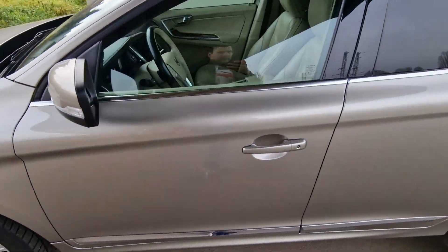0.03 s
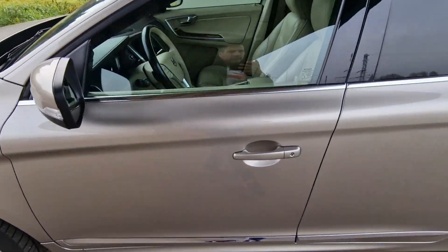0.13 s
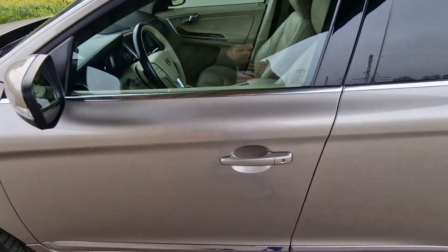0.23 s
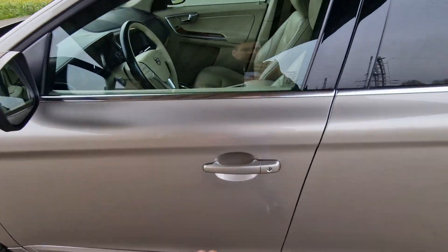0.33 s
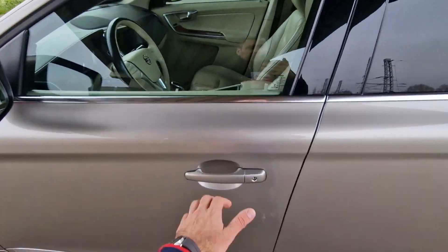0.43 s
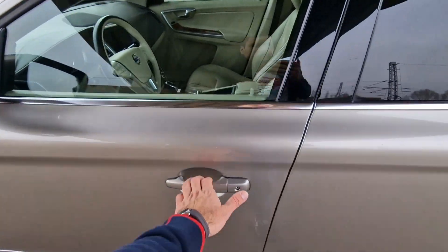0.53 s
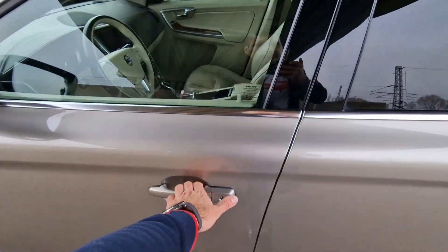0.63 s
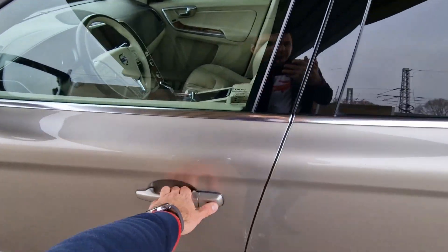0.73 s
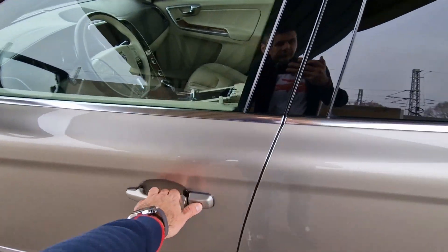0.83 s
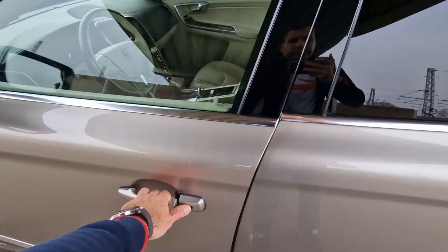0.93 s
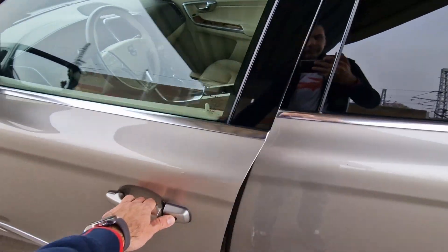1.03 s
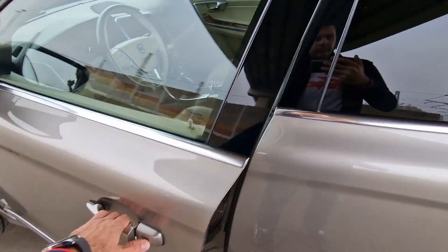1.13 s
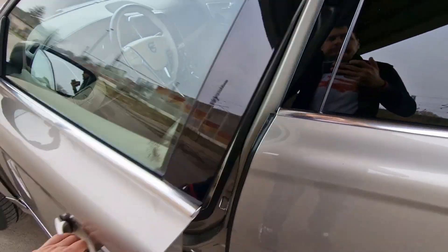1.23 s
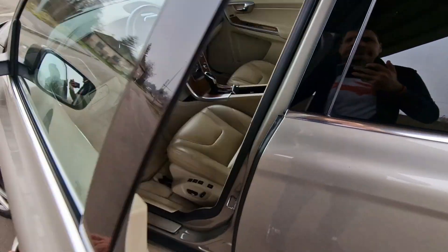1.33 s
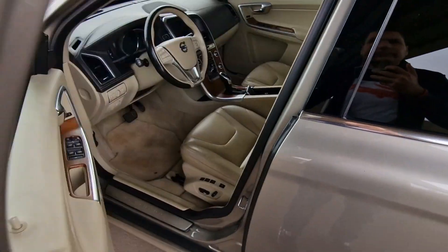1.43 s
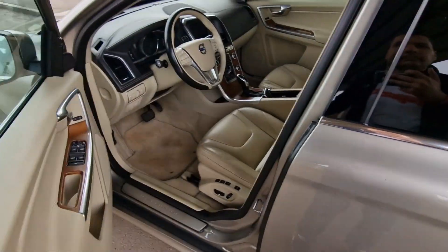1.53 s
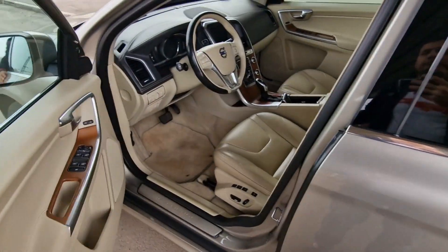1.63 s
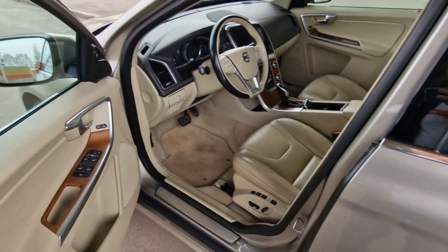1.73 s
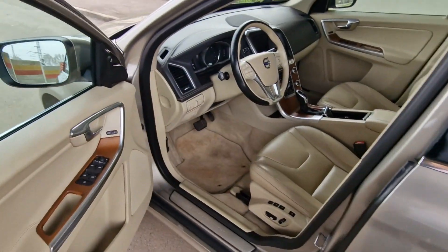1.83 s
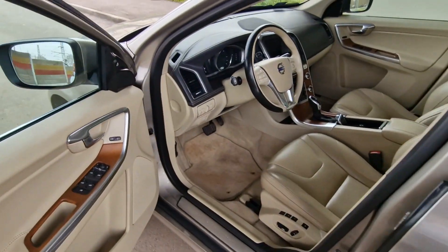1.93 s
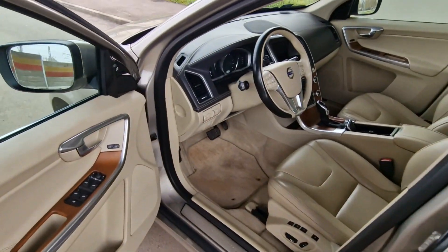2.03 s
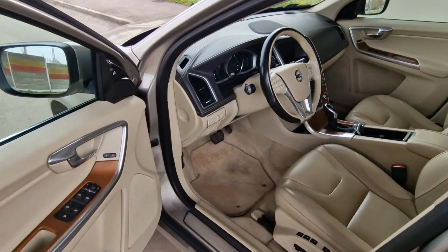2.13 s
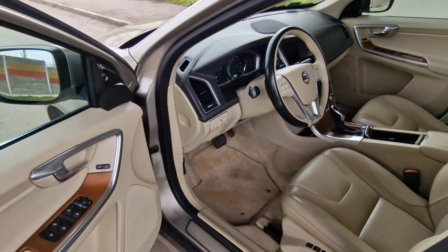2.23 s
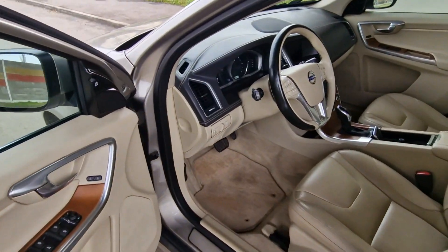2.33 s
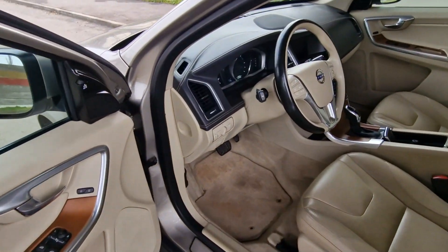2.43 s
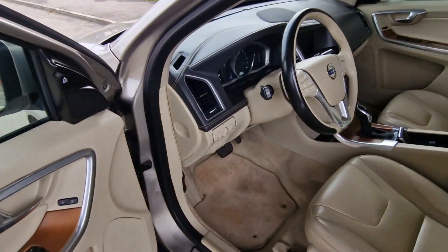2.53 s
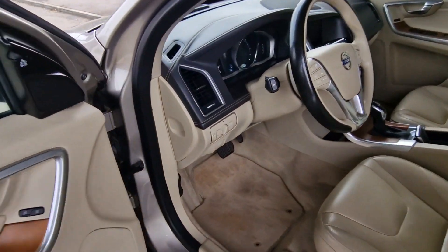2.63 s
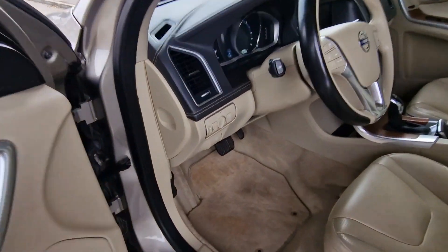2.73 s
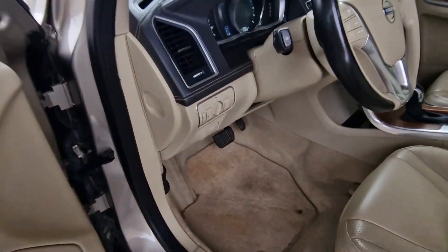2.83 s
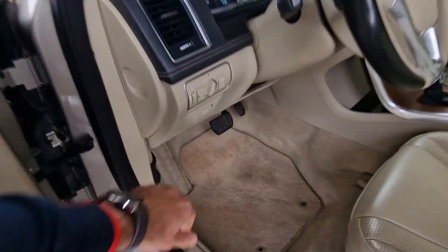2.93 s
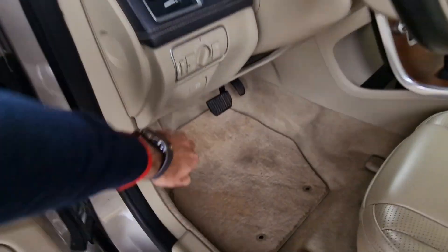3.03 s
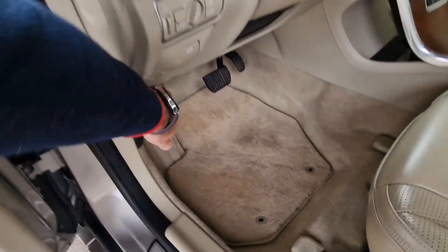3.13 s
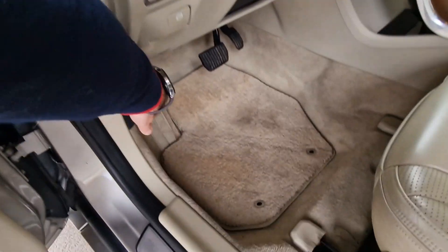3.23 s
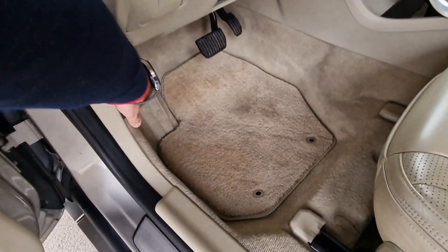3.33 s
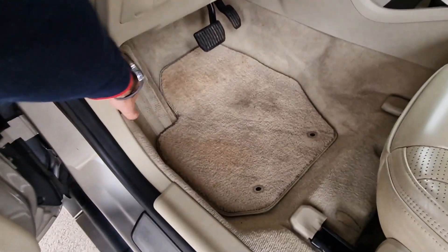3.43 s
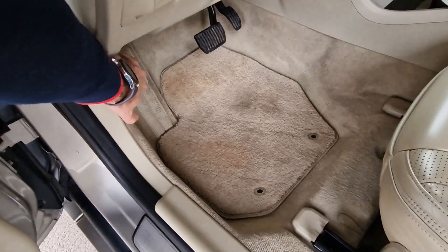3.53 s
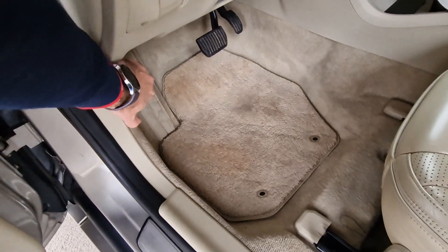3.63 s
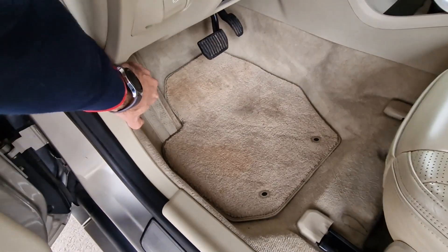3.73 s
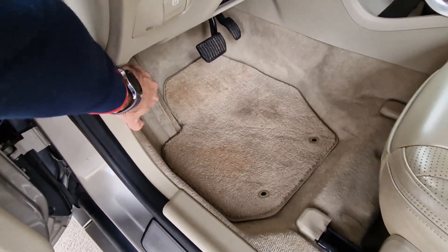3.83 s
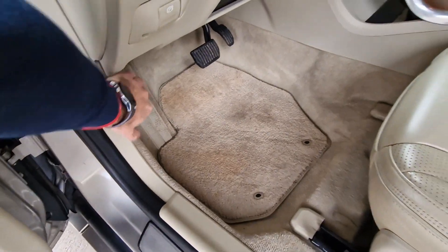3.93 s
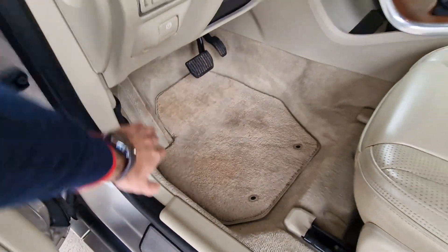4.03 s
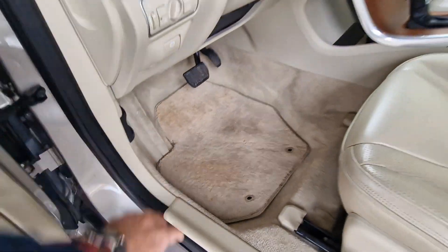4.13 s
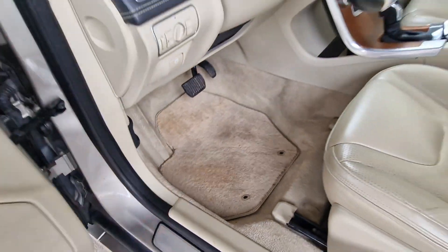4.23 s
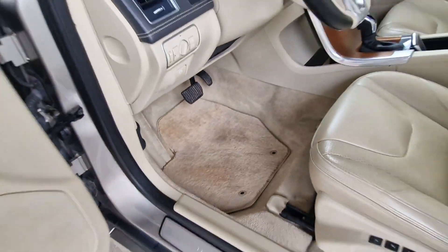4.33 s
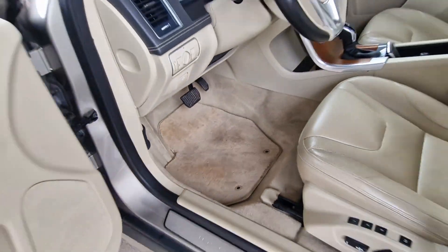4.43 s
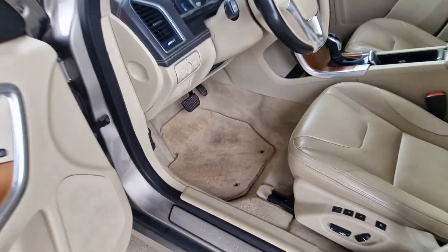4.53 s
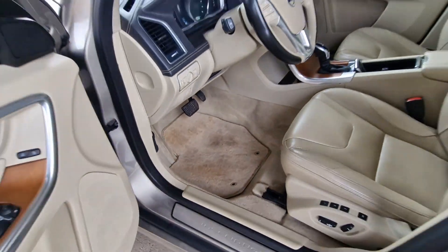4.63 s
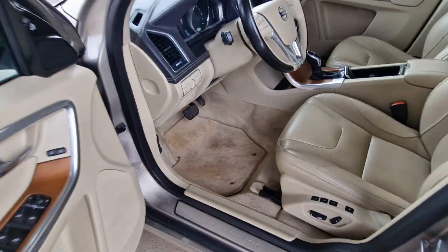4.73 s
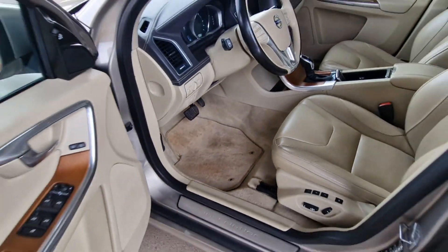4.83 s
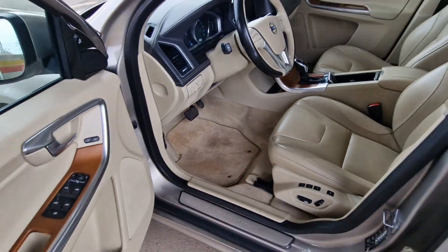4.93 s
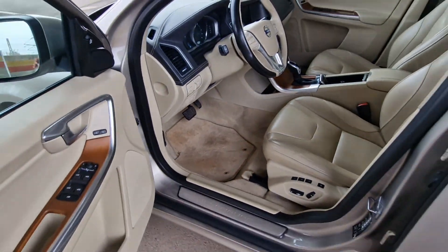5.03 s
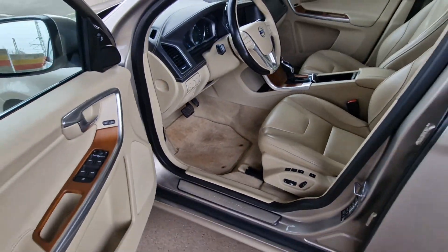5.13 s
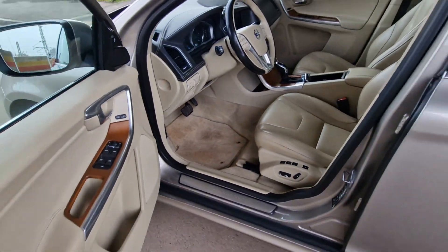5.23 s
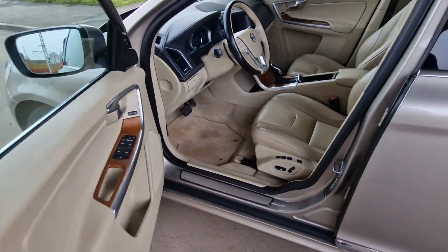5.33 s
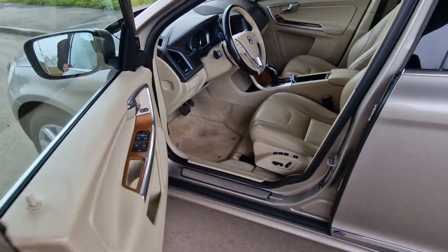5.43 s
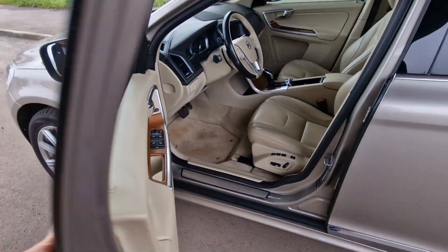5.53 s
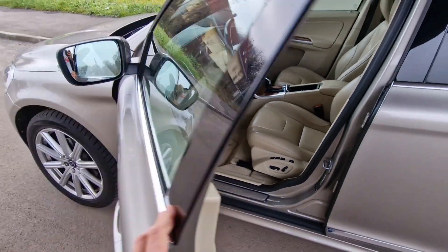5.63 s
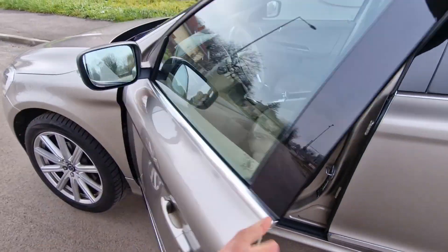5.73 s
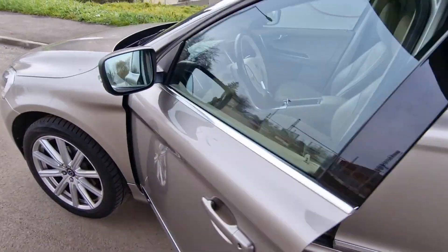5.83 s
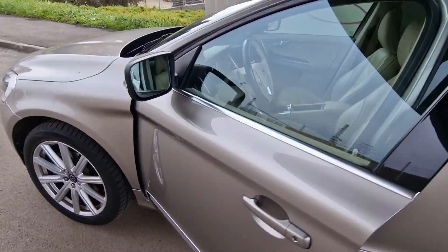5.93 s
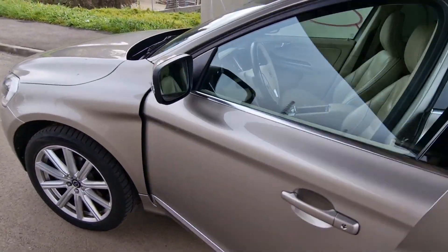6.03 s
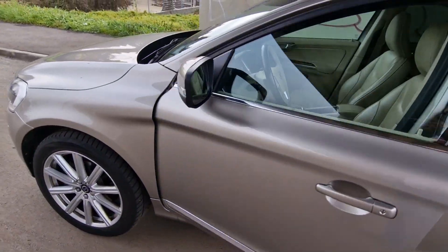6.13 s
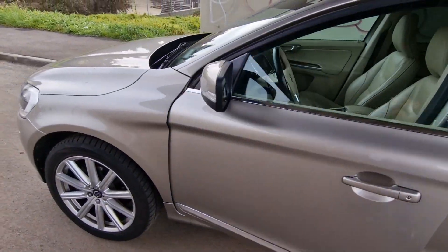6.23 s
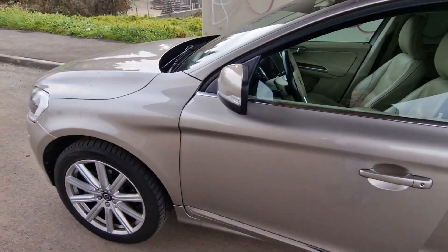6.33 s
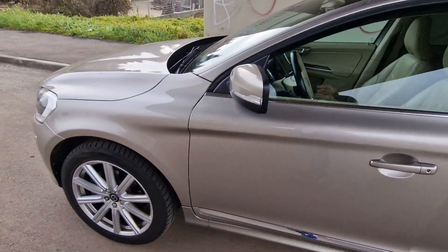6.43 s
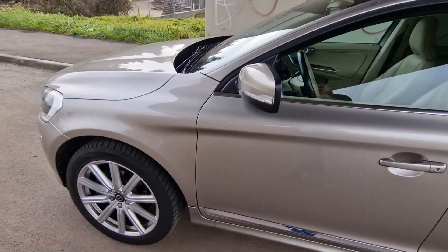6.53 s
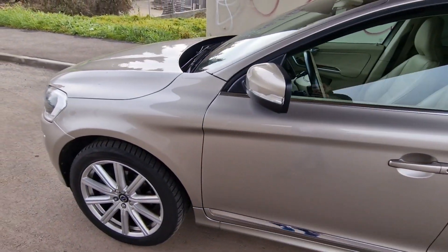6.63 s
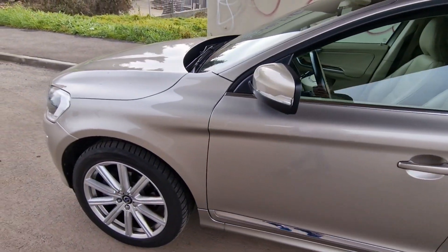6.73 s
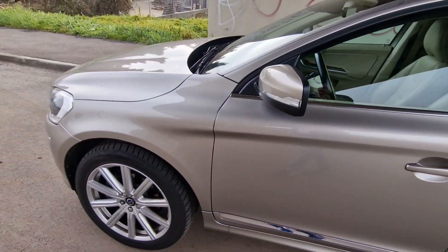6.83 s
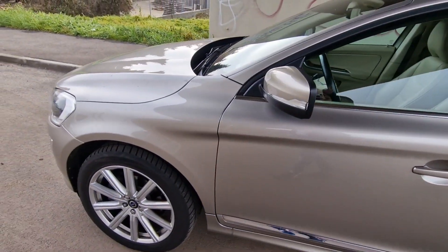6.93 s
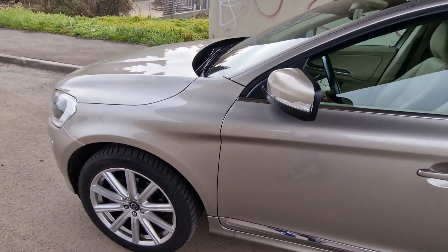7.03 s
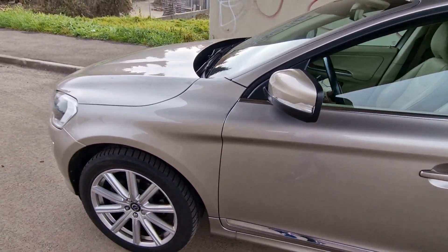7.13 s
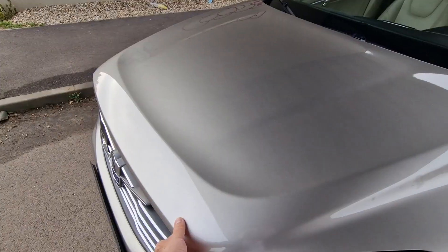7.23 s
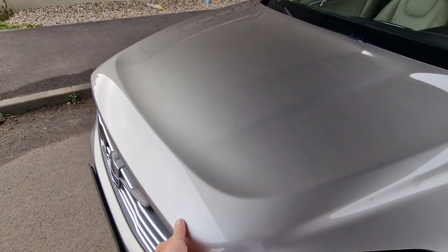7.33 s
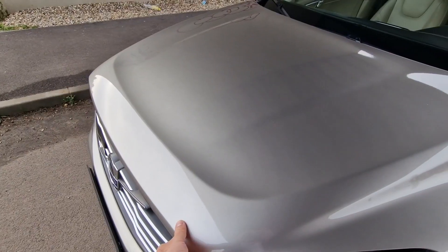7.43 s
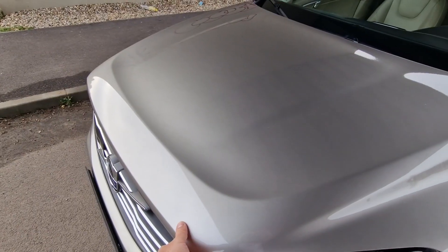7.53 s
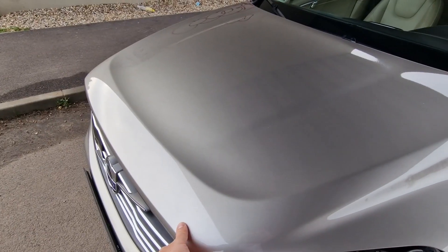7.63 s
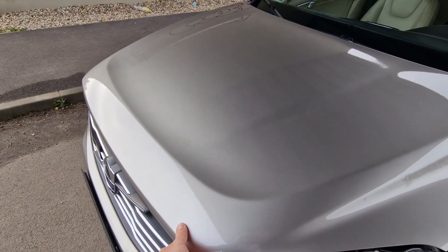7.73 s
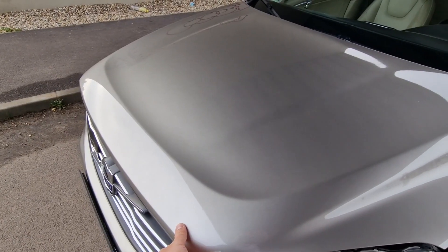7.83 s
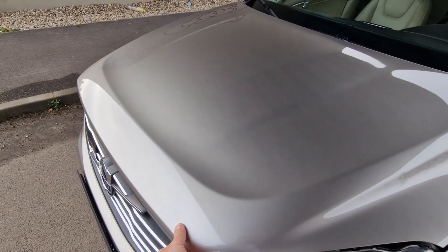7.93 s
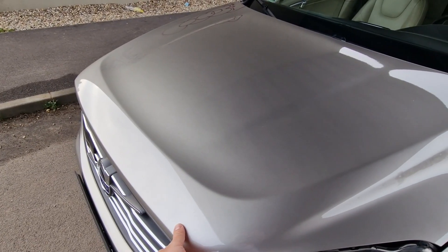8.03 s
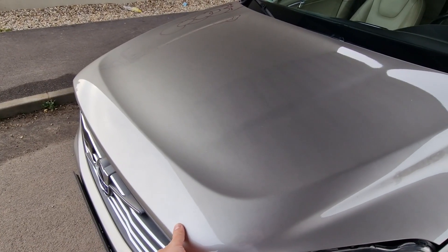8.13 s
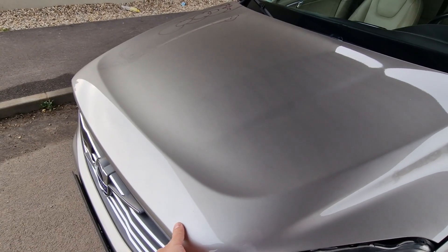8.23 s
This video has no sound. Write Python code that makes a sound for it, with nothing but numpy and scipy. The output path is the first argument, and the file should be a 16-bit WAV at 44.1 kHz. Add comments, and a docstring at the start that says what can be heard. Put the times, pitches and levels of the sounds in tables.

```python
"""A car door is unlatched, swung through its check stops and later slammed; each contact is a rattle of
dense clicks that excites latch modes, while soft pushes excite the door panel and the cabin air.
Between, the bonnet lever is pulled in the footwell: clicks, thumps, a groaning strain and a creaking cable.
Ticks, brushes, rubbing cloth, traffic roar, an engine hum, whines and hiss are shaped noise or tones.
Two microphone ports a hand apart hear the contacts with a small frequency-dependent lag."""
import sys
import numpy as np
from scipy import signal
from scipy.fft import rfft, irfft
from scipy.io import wavfile

SR = 44100
rng = np.random.default_rng(int(sys.argv[2]) if len(sys.argv) > 2 else 0)


def wrap_up_sound(samples):
    """Save the sound to the file named by the first command line argument, as 16-bit audio."""
    columns = np.atleast_2d(samples).T
    # keep every value between -1 and 1, then stretch to whole-number steps
    tamed = np.clip(columns, -1, 1)
    steps = np.round(tamed * 32767).astype(np.int16)
    wavfile.write(sys.argv[1], SR, steps)


N = 366030

CLOTH_BRIGHT_DB = -60   # rubbing level at which the cloth sounds bright


def door():
    """Modal excitation: contact rattle rings the latch, and with the thumps the panel and cabin modes."""
    # latch, handle and frame strike metal: t/s, rattle level/dB, panel thump/dB, t60/ms, treble/dB
    strikes = [(0.841, -30.5, -25, 45.9, 18), (0.8784, -11, -8, 23.685, 3.5),
               (0.8938, -37, -13.5, 46.7, -4), (.963, -26.5, -52.5, 33.1, -27),
               (1.478, -12, -16, 133.02, -2), (1.506, -24.5, -15.5, 57.46, -9),
               (6.4785, -22.5, -21.5, 247.1, -25.5), (6.4951, -12.5, -5.5, 59.33, -3.5),
               (6.521, -25.5, -27, 53.7, -14), (6.5284, -11, -15, 25.415, -9),
               (6.664, -48.5, -25, 74.6, -26.5)]
    # trim and glass shudder on after the two hard stops: t/s, rattle level/dB
    shudders = [(1.53, -36), (6.555, -40.5)]
    # check strap rolls over its stops: t/s, panel thump/dB
    stops = [(.788, -32.5), (1.391, -19.5), (1.694, -21), (5.704, -24), (6.054, -24.5)]
    # modes of the latch: f/Hz, relative level/dB, t60/s
    latch_modes = [(549.67, -2, 0.05054), (650.4, 0, 0.03461), (1025.5, 2.5, 0.01877),
                   (1309.7, 5.5, 0.019888), (1604.8, -2.5, 0.016), (2141.3, -9.5, 0.03),
                   (2780.8, -15.5, 0.016), (3688.8, -14.5, 0.053)]
    # modes of the open door panel: f/Hz, relative level/dB, t60/s
    panel_modes = [(147.11, -9, 0.11516), (196.63, 2.5, 0.08519), (220.32, -3.5, 0.09315),
                   (284.19, -1, 0.08632), (353.11, 1, 0.07513), (417.54, -2.5, 0.065),
                   (544.21, -19.5, 0.11), (636.2, -25, 0.071)]
    # modes of the cabin: f/Hz, relative level/dB, t60/s
    cabin_modes = [(28.12, -14, 0.715), (62.189, -2.5, 0.899), (68.188, -4, 0.7836), (80.669, -3.5, 0.5755),
                   (130.75, -13, 0.743), (162.91, -2.5, 0.0952)]
    strike_rise_ms = 3.5
    shudder_rise_ms, shudder_t60_ms, shudder_treble_db = 19, 753.3, -20.5
    shudder_thump_db = 12   # relative to its rattle
    stop_rattle_db = -20   # relative to its thump
    stop_rise_ms, stop_t60_ms, stop_treble_db = 2.5078, 41.23, -37
    thump_lead_ms = 2.7736   # the push starts before the rattle peaks
    shut_s = 6.485
    open_boom_db, shut_boom_db = -21, -3.5   # relative to the thump: the sealed cabin booms more
    sealed_decay, sealed_db = 0.5543, -3.5   # the seal damps the shut panel: share of t60, change of level

    hard = [(s, db, strike_rise_ms, t60_ms, treble_db, thump_db)
            for s, db, thump_db, t60_ms, treble_db in strikes]
    hard += [(s, db, shudder_rise_ms, shudder_t60_ms, shudder_treble_db, db + shudder_thump_db)
             for s, db in shudders]
    hard = np.array(hard)
    dull = [(s, db + stop_rattle_db, stop_rise_ms, stop_t60_ms, stop_treble_db) for s, db in stops]
    rattle = rattles(hard[:, :5], rough_db=3.5, corner_hz=2281.7, scatter_db=1.5)
    rattle = rattle + rattles(dull, rough_db=6.5, corner_hz=850, scatter_db=-29.5)
    latch = rattle + from_db(-28.5) * ring(rattle, latch_modes, True, vary_db=3.5)

    thumps = np.array([*hard[:, [0, 5]], *stops]) - [thump_lead_ms / 1000, 0]
    sense = np.where(thumps[:, 0] > shut_s, 1, -1)   # the slam drives the panel the other way
    drive = from_db(-28.0) * rattle + pushes(thumps, 3.129, sense)
    shut = np.arange(N) / SR > shut_s
    sealed_modes = [(hz, db + sealed_db, t60 * sealed_decay) for hz, db, t60 in panel_modes]
    panel = ring(drive * ~shut, panel_modes, True) + ring(drive * shut, sealed_modes, False)

    booms = [(s, db + (shut_boom_db if s > shut_s else open_boom_db)) for s, db in thumps]
    cabin = ring(pushes(booms, 3.978, sense), cabin_modes, False)
    return latch + panel + from_db(2.5) * cabin


def lever():
    """Modal excitation with stick-slip: clicks and creaks ring the lever, tugs and groan the footwell."""
    # clicks and scrapes of the plastic lever and cable: t/s, level/dB, rise/ms, t60/ms, treble/dB
    clicks = [(3.43, -43, 19.37, 125.4, -7.5), (3.447, -30.5, 10.59, 75.6, -9),
              (3.593, -29.5, 4.309, 124.23, -4), (3.629, -43, 24.035, 472, -1),
              (3.955, -37, 67.27, 240, -1.5), (3.988, -6, 13, 64.95, 0), (4.344, -34, 14, 123.43, -1),
              (4.424, -37, 30, 142.8, -2.5), (4.44, -34, 4.364, 90.94, -4.5), (4.507, -40, 4.402, 69.26, 0)]
    # modes of the lever: f/Hz, relative level/dB, t60/s
    lever_modes = [(600, 2, 0.03), (813, -1, 0.03), (1090, 10, .03), (1780, 7, 0.022), (2510, -7, .035),
                   (3290, -9, .06), (4110, -23, .25)]
    # modes of the footwell: f/Hz, relative level/dB, t60/s
    footwell_modes = [(66.741, -7.5, 0.4148), (97.3, -4, 0.091), (161.03, -5.5, 0.1295), (249, -8, 0.09),
                      (371.7, -6, 0.074), (540, -10, 0.024)]
    # tugs that thump the footwell: t/s, push level/dB
    tugs = [(3.465, -28), (3.495, -32), (3.588, -25), (3.988, -35)]
    # cable strains and trim groans, dying away: start t/s, noise level before filtering/dB, t60/s
    strains = [(3.452, -54.5, 0.46), (3.6, -56, 0.82)]
    groan_hz = 262   # low-pass corner
    slips_per_s, creak_db = 300, -3.5   # stick-slip jerks of the cable; size relative to the strain noise

    rattle = rattles(clicks, rough_db=5.5, corner_hz=2600, scatter_db=7.0)
    strain, t = np.zeros(N), np.arange(SR // 2) / SR
    for start, level_db, t60 in strains:
        envelope = from_db(level_db - 60 * t / t60) * np.minimum(t / 0.013, 1)
        add(strain, start, envelope * rng.standard_normal(len(t)))
    slips = rng.random(N) < slips_per_s / SR
    creak = from_db(creak_db) * np.diff(strain * slips, prepend=0)
    groan = signal.lfilter(*signal.butter(1, groan_hz, fs=SR), strain)
    body = ring(from_db(-38.5) * rattle + creak, lever_modes, False, vary_db=4.0)
    footwell = ring(groan - pushes(tugs, 2.1) + from_db(-38) * rattle, footwell_modes, True)
    return rattle + body + footwell


def catch():
    """Contact noise: fingers nudge the bonnet catch, giving faint rattles without ringing modes."""
    # nudges: t/s, rattle level/dB, rise/ms, t60/ms, treble/dB
    nudges = [(7.639, -44.5, 3, 76.4, -14.5), (7.652, -46, 4, 207.3, -12)]
    return rattles(nudges, rough_db=3.0, corner_hz=3984, scatter_db=4.5)


def ticks():
    """Damped resonance: a short noise burst rings one wide mode; higher ticks add a low-passed knock."""
    # small ticks and knocks close by: t/s, relative peak level/dB, f/Hz, right port lag/ms
    contacts = [(0.183, -39, 1215, 0.0029), (0.187, -36, 7780, 0.3094), (0.331, -38.5, 4636, 0.36),
                (.372, -35, 2886, 0.5503), (.64, -42.5, 7370, .45), (2.331, -43, 11690, 0.34),
                (3.758, -27.5, 7275, 0.3975), (3.835, -26.5, 1329, -0.2341), (3.836, -37.5, 448.5, -0.1915),
                (4.049, -29, 8970, 0.54), (4.115, -28, 4332, 0.38), (4.13, -36, 4498, 0.29),
                (4.987, -31.5, 4609, 0.45), (5.083, -30, 5952, 0.4), (5.185, -38.5, 2480, 0.5378),
                (5.259, -22.5, 5944, -0.2389), (5.267, -31.5, 8960, -0.1333), (6.994, -44, 3612, 0.353),
                (7.865, -44, 2914, 0.332)]
    fixed_t60_ms, cycles = 14, 8   # decay: a fixed part plus some cycles
    knock_hz = 2400   # low-pass corner of the knock
    out, t = np.zeros((2, N)), np.arange(SR // 20) / SR
    for s, peak_db, hz, later_ms in contacts:
        t60_ms = fixed_t60_ms + 1000 * cycles / hz
        shared, *own = rng.standard_normal((3, len(t)))
        envelope = np.minimum(t / .0006, 1) * from_db(-60000 * t / t60_ms)
        burst = (shared + .6 * np.array(own)) * envelope
        tick = resonate_twice(burst, hz, 0.5 + min((knock_hz / hz) ** 2, 3.0))   # low knocks ring longer
        if hz > knock_hz:
            tick = tick + from_db(-2.5) * signal.lfilter(*signal.butter(1, knock_hz, fs=SR), burst)
        left, right = from_db(peak_db) * tick / abs(tick).max()
        add(out[0], s, from_db(-5.0) * left)
        add(out[1], s + later_ms / 1000, right)
    return out


def brushes():
    """Friction noise: cloth or skin dragged past trim, as grains round one broad resonance plus treble."""
    # brushes of sleeve and hand: start t/s, end t/s, level of the resonant part/dB, f/Hz, relative treble/dB
    strokes = [(0.791, 0.93, -38, 407.1, -26.5), (2.793, 2.97, -47.5, 3237, -2),
               (3.119, 3.212, -52.5, 3294, 11.5), (3.335, 3.393, -57, 2992, -16),
               (5.598, 5.844, -61, 6798, -21), (5.964, 6.196, -63, 6730, -12),
               (6.286, 6.44, -57.5, 6558, -7.5)]
    out = np.zeros((2, N))
    for start, end, level_db, hz, treble_db in strokes:
        size = round((end - start) * SR)
        shared, *own = rng.standard_normal((3, size)) * from_db(1.588 * rng.exponential(1, size))
        grains = shared + 2.016 * np.array(own)
        treble = signal.lfilter(*signal.butter(2, 5000, "high", fs=SR), grains)
        rub = rms_one(resonate_twice(grains, hz, .7)) + from_db(treble_db) * rms_one(treble)
        add(out, start, from_db(level_db) * rub * signal.windows.tukey(size, .8))
    return out


def tail(x, level_db):
    """Diffuse decay of bodywork: the energy of each band of the door and lever sounds dies away as noise at its
    own rate."""
    # decay times: f/Hz, t60/s
    decay = [(100, 0.8355), (260, 0.3357), (700, 0.2095), (1840, 0.19157), (4850, 0.14), (12800, 0.15)]
    out = 0
    for hz, noise in bands([(95, 0), (16000, 0)]):
        part = signal.sosfilt(signal.butter(1, [hz / 1.2, hz * 1.2], "band", fs=SR, output="sos"), x)
        r = from_db(-120 / (at_hz(decay, hz) * SR))   # decay of the squared signal
        energy = signal.lfilter([1 / 400], [1, -r], part ** 2 + 1e-18)
        out = out + np.sqrt(energy) * rms_one(noise)
    return from_db(level_db) * out


def cloth():
    """Friction noise of sleeve and jacket: the treble share grows with the rubbing level."""
    # rubbing: t/s, level of the main band before panning/dB
    rubbing = [(0, -63.5), (.7, -61.5), (1.05, -65.5), (1.9, -68), (2.5, -62.5), (2.9, -57.5), (3.35, -63),
               (3.9, -62.5), (4.25, -64.5), (4.8, -63), (5.45, -67.5), (6.25, -63.5), (6.9, -73.5),
               (7.4, -83), (8.1, -67), (8.3, -70)]
    # main spectrum: f/Hz, relative density per Hz/dB
    main_spectrum = [(600, -2), (2400, -15), (3700, 0), (5000, -8), (6300, 0.5), (7800, -1.5), (9300, -3),
                     (11000, -51)]
    # treble spectrum: f/Hz, relative density per Hz/dB
    top_spectrum = [(9000, -4), (11000, -19), (13000, -9.5), (17000, -35.5)]
    treble_per_db = 4
    open_s, open_treble_db = (2.7, 6.1), 21.5   # the treble is fuller during this span
    t = np.arange(N) / SR
    level_db = np.interp(t, *np.transpose(rubbing))
    fuller = (t > open_s[0]) & (t < open_s[1])
    treble_db = treble_per_db * (level_db - CLOTH_BRIGHT_DB) + open_treble_db * fuller
    treble_db = np.clip(treble_db, -32, 0)
    rub = patchy_noise(main_spectrum, patchy_db=2.0, rate=36)
    rub = rub + from_db(treble_db) * patchy_noise(top_spectrum, patchy_db=1.5, rate=37)
    return from_db(level_db) * (rub + crackles(level_db)) * from_db([[-1.2], [1.2]])


def crackles(level_db):
    """Poisson-like snaps, each a decaying burst of treble noise; more of them when the cloth is louder."""
    bright_per_s, size_db = 9.4, 8   # rate at the bright level; size relative to the rubbing
    chance = bright_per_s * from_db(level_db - CLOTH_BRIGHT_DB) / SR
    snaps = (rng.random(N) < chance) * rng.uniform(.3, 1, N)
    r = from_db(-60 / (0.0318 * SR))   # t60 of 31.8 ms
    bursts = signal.lfilter([1], [1, -r], snaps + 1e-18) * rng.standard_normal((2, N))
    return from_db(size_db) * signal.sosfilt(
        signal.butter(2, [5500, 9200], "band", fs=SR, output="sos"), bursts)


def street():
    """Power addition: swells of tyre roar add to steady tyre noise, and the rumble follows in part."""
    # swells of tyre roar, one of them only a brief blip: loudest t/s, level in the open/dB,
    # time to change by 3 dB/s (the sign has no effect)
    swells = [(0, -51.5, 0.3295), (1.8, -56.5, .5), (2.7, -55.5, .5), (5.7, -62.5, -0.0023),
              (6.45, -56.5, -1.5182), (8.3, -56, 0.1104)]
    # rumble spectrum: f/Hz, relative density per Hz/dB
    rumble_spectrum = [(20, -31.5), (40, -4), (60, -0.5), (90, -9.5), (130, -9), (200, -16.5), (300, -20),
                       (500, -30)]
    # tyre spectrum: f/Hz, relative density per Hz/dB
    tyre_spectrum = [(300, 23.5), (470, -13.5), (660, -1), (950, -3), (1400, -1.5), (2140, -8),
                     (3200, -23.5), (4600, -55.5), (7000, -35.5), (9000, -45)]
    rumble_db, tyres_db = -46.5, -59   # steady levels in the open
    rumble_follows = 0.5079   # share of the roar's swing in dB
    # down in the footwell the street is screened off
    shelter_s, duck_s, emerge_s = (2.97, 4.1882), 0.03145, 0.6268
    shelter_rumble_db, shelter_tyres_db = -2, -5
    t = np.arange(N) / SR
    corners = [shelter_s[0] - duck_s, *shelter_s, shelter_s[1] + emerge_s]
    screened = np.interp(t, corners, [0, 1, 1, 0])
    power = from_db(tyres_db) ** 2 + sum(
        from_db(db) ** 2 / (1 + ((t - s) / fade) ** 2) for s, db, fade in swells)
    roar = np.sqrt(power)
    swing = (roar / from_db(tyres_db)) ** rumble_follows
    rumble = swing * from_db(rumble_db + shelter_rumble_db * screened)
    rumble = rumble * patchy_noise(rumble_spectrum, patchy_db=2.5, rate=5.4)
    tyres = roar * from_db(shelter_tyres_db * screened)
    return rumble + tyres * patchy_noise(tyre_spectrum, patchy_db=1.5, rate=5.7)


def hum():
    """Frequency-modulated tone: one low order of an engine far off swells, wavers a little and fades."""
    loudest_s, mean_hz, peak_db = 5.3942, 53.874, -41
    swell_s, fade_s = 0.992, 0.2874   # time to gain or lose 10 dB about the loudest moment
    late = np.arange(N) / SR - loudest_s
    level_db = peak_db - 10 * np.where(late < 0, late / swell_s, late / fade_s) ** 2
    amplitude = np.sqrt(2) * from_db(level_db + 1.4 * drift(3.8))
    hz = mean_hz * (1 + 0.01992 * drift(3.111))
    return amplitude * np.sin(2 * np.pi * np.cumsum(hz) / SR)


def whines():
    """Quadrature modulation: low-passed noise spreads a gliding tone to a band, unlike in the two ports."""
    # faint whines, a broad soft hiss at the start and other short bands of noise:
    # start t/s, end t/s, start f/Hz, end f/Hz, width/Hz, mean level/dB
    glides = [(0, .47, 4280, 3800, 150, -67.5), (0, .47, 3000, 3100, 2000, -62),
              (1.951, 2.972, 1020, 998, 120, -62.5), (5.498, 5.759, 1450, 1494, 350, -56.5),
              (7.9, 8.3, 3500, 4200, 1200, -72), (7.445, 7.495, 7900, 7850, 500, -72),
              (8.0, 8.28, 7360, 7350, 450, -74)]
    out = np.zeros((2, N))
    for start, end, start_hz, end_hz, width, level_db in glides:
        size = round((end - start) * SR)
        turn = 2 * np.pi * np.cumsum(np.linspace(start_hz, end_hz, size)) / SR
        noise = rng.standard_normal((2, 2, size + 2000))
        a, b = signal.lfilter(*signal.butter(2, width / 2, fs=SR), noise)[..., 2000:]   # settled part
        tone = rms_one(a * np.cos(turn) + b * np.sin(turn))
        waver = from_db(1.426 * drift(10.4)[:size])
        add(out, start, from_db(level_db) * tone * signal.windows.tukey(size, .4) * waver)
    return out


def thin_hiss():
    """Resonant filtering: noise passes twice through each narrow resonance, unlike in the two ports."""
    # thin wavering hiss: f/Hz, width of one pass/Hz, mean level/dB
    hiss_bands = [(6306, 290, -78.5), (7442, 800, -83.5)]
    out = 0
    for hz, width, level_db in hiss_bands:
        band = resonate_twice(rng.standard_normal((2, N)), hz, hz / width)
        out = out + from_db(level_db + 1.79 * drift(2.0)) * rms_one(band)
    return out


def rattles(rows, rough_db, corner_hz, scatter_db):
    """Contact noise: dense uneven clicks swell and die; each port hears some treble of its own."""
    # rows: peak t/s, relative level/dB, rise/ms, t60/ms, relative treble/dB
    out, t = np.zeros((2, N)), np.arange(SR // 2) / SR
    low, high = (signal.butter(1, corner_hz, kind, fs=SR) for kind in ("low", "high"))
    for s, level_db, rise_ms, t60_ms, treble_db in rows:
        rise = rise_ms / 1000
        unevenness = from_db(rough_db * np.minimum(rng.exponential(1, len(t)), 4))
        shared, *own = rng.standard_normal((3, len(t))) * unevenness
        scatter = from_db(scatter_db) * signal.lfilter(*signal.butter(2, 1200, "high", fs=SR), own)
        raw = shared + scatter
        clicks = rms_one(signal.lfilter(*low, raw))
        clicks = clicks + from_db(treble_db) * rms_one(signal.lfilter(*high, raw))
        swell = np.where(t < rise, (t / rise) ** 2, from_db(-60000 * (t - rise) / t60_ms))
        add(out, s - rise, from_db(level_db - 5.5) * swell * rms_one(clicks))
    return out


def pushes(rows, ms, sense=1):
    """Impulse and rebound: each soft push (t/s, level/dB) is followed by a weaker one about 8 ms later."""
    out, push = np.zeros(N), np.hanning(round(ms * SR / 1000))
    push = push / push.sum()
    lateness = rng.uniform(.94, 1.06, len(rows))
    for (s, level_db), late, sign in zip(rows, lateness, np.broadcast_to(sense, len(rows))):
        add(out, s, sign * from_db(level_db) * push)
        add(out, s + 0.0080508 * late, 0.3437 * sign * from_db(level_db) * push)
    return out


def ring(x, modes, flip, vary_db=0):
    """Modal superposition: parallel damped modes, struck harder or softer as the contact shifts."""
    out = 0
    for k, (hz, level_db, t60) in enumerate(modes):
        r, w = from_db(-60 / (t60 * SR)), 2 * np.pi * hz / SR
        struck = x * from_db(level_db + vary_db * drift(9.32)) + 1e-18
        sign = (-1) ** (k * flip)   # with flip, neighbours start in opposite senses
        out = out + sign * signal.lfilter([0, np.sin(w)], [1, -2 * r * np.cos(w), r * r], struck)
    return out


def resonate_twice(x, hz, q):
    """Cascaded resonance: the same peak filter applied twice."""
    peak = signal.iirpeak(hz, q, fs=SR)
    return signal.lfilter(*peak, signal.lfilter(*peak, x))


def bands(spectrum):
    """Partial coherence: half-octave noise bands with the left-right likeness of far sound."""
    # left-right correlation: f/Hz, correlation
    likeness = [(60, 0.97553), (200, 0.9675), (400, 0.8081), (750, 0.3667), (1300, -0.0877), (2400, 0.018),
                (8000, -0.1116)]
    white, edges = rng.standard_normal((2, 2, N)), 22 * 2 ** np.arange(0, 9.7, .5)
    for k, (low, high) in enumerate(zip(edges, edges[1:])):
        hz = np.sqrt(low * high)
        if spectrum[0][0] <= hz <= spectrum[-1][0]:
            band = signal.butter(2, [low, high], "band", fs=SR, output="sos")
            mid, side = signal.sosfilt(band, white[k % 2])
            alike = np.clip(at_hz(likeness, hz), -1, 1)
            yield hz, np.sqrt(1 + alike) * mid + np.sqrt(1 - alike) * side * [[1], [-1]]


def patchy_noise(spectrum, patchy_db, rate):
    """Band modulation: coloured noise of rms 1 whose bands swell partly together, partly alone."""
    together, out = drift(rate / 4), 0
    for hz, band in bands(spectrum):
        swell_db = patchy_db * (0.27 * together + drift(rate))
        out = out + from_db(at_hz(spectrum, hz) + swell_db) * band
    return rms_one(out)


def drift(rate):
    """Low-passed noise: slow chance of spread 1, drawn at every 40th sample; a higher rate is quicker."""
    r = np.exp(-80 * np.pi * rate / SR)
    slow = signal.lfilter([1], [1, -2 * r, r * r], rng.standard_normal(N // 40 + 2002))[2000:]
    return np.interp(np.arange(N) / 40, np.arange(len(slow)), rms_one(slow))


def from_db(db):
    """Decibel definition: amplitude ratio of a level."""
    return 10 ** (np.asarray(db) / 20)


def rms_one(x):
    """Normalisation to unit mean power."""
    return x / np.sqrt(np.mean(x ** 2) + 1e-20)


def at_hz(points, hz):
    """Interpolation of a curve along logarithmic frequency."""
    return np.interp(np.log(hz), np.log(np.array(points)[:, 0]), np.array(points)[:, 1])


def add(track, s, piece):
    """Superposition: a piece joins the track from s seconds on."""
    at = round(s * SR)
    track[..., at:at + piece.shape[-1]] += piece[..., :N - at]


def ports(x, lag_share, pan_db):
    """Path difference: the left port is nearer the car, so the right one hears it later."""
    # full lag of the right port, of which a share is used: f/Hz, lag/ms
    port_lag = [(100, 0.14), (600, 0.23), (1500, 0.59668), (16000, 0.471)]
    hz = np.arange(N // 2 + 1) * SR / N + 1e-3
    lag_s = lag_share * at_hz(port_lag, hz) / 1000
    late = irfft(rfft(x[1]) * np.exp(-2j * np.pi * hz * lag_s), N)
    return np.array([x[0], late]) * from_db([[pan_db / 2], [-pan_db / 2]])


def scene():
    """Superposition of near contacts, their decaying tail and the background."""
    swing, pull = door(), lever()
    near = ports(swing, lag_share=0.76194, pan_db=0.001) + ticks()
    near = near + ports(pull + brushes() + catch(), lag_share=0.853, pan_db=-1.5)
    dying = tail(swing[0] + from_db(-8.5) * pull[0], level_db=-12.5)
    return near + dying + cloth() + street() + hum() + whines() + thin_hiss()


def record(dry):
    """Linear filtering and saturation: the ports colour the sound, peaks are rounded, the top is cut."""
    # port response: f/Hz, gain/dB
    port_colour = [(20, 0.5), (3000, 3), (7000, -2), (8800, -2), (10200, -12.5), (11800, -6.5), (17000, -7)]
    cutoff_hz = 16400
    hz = np.arange(N // 2 + 1) * SR / N + 1e-3
    coloured = irfft(rfft(dry) * from_db(at_hz(port_colour, hz)), N)
    rounded = .95 * np.tanh(coloured / .95)
    return signal.sosfilt(signal.cheby2(20, 90, cutoff_hz, fs=SR, output="sos"), rounded)


dry = scene()
out = record(dry)
wrap_up_sound(out)
```